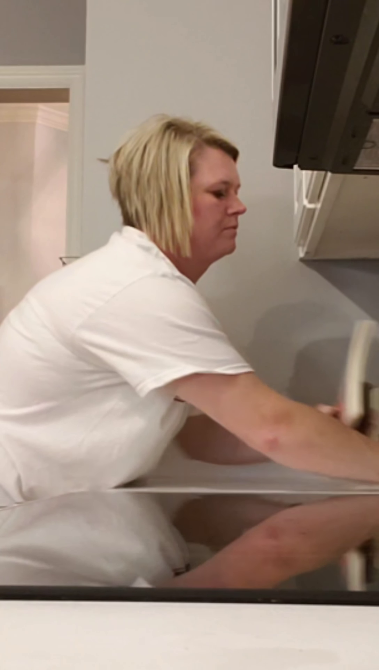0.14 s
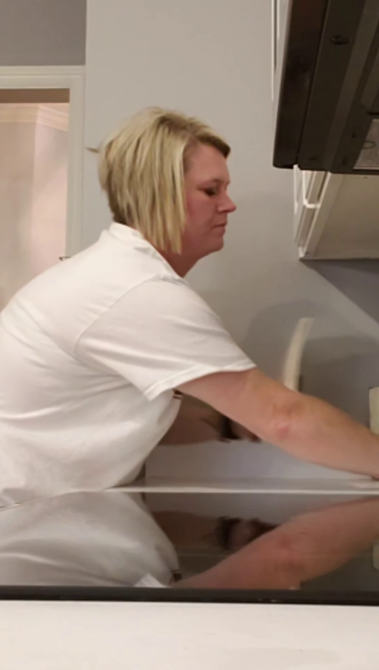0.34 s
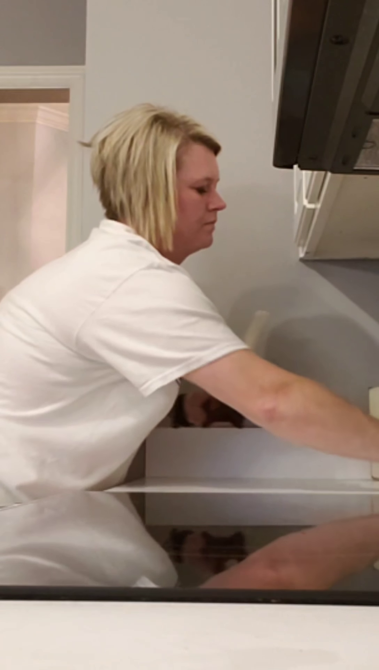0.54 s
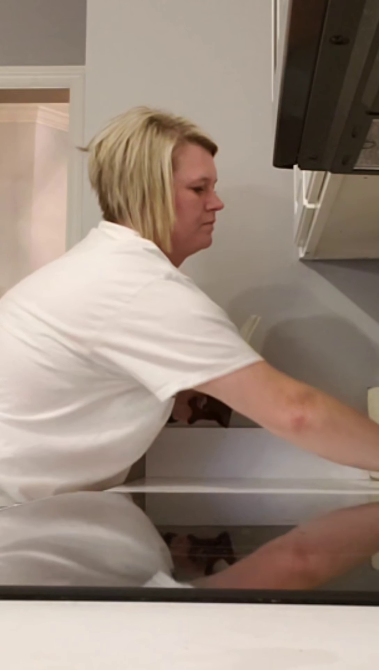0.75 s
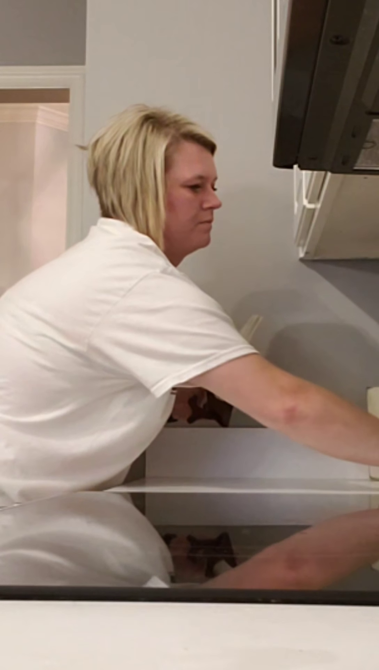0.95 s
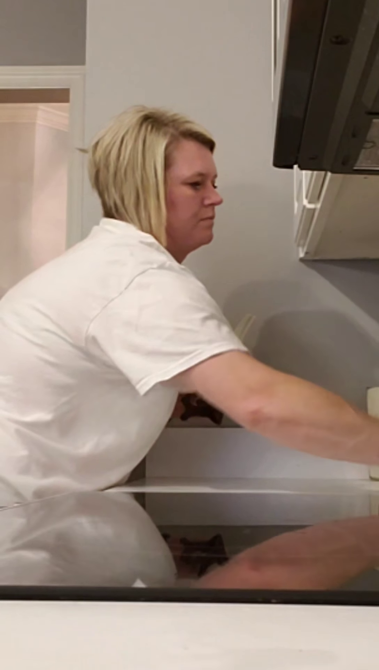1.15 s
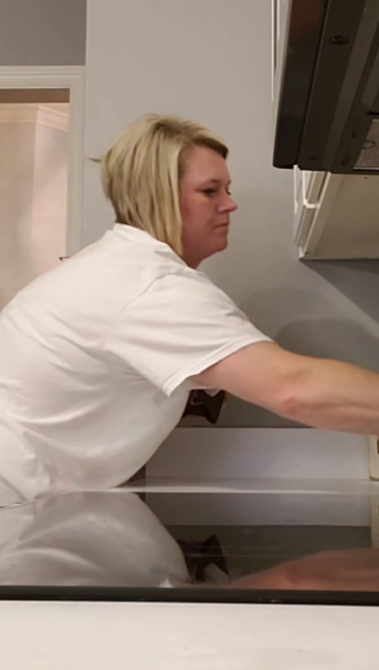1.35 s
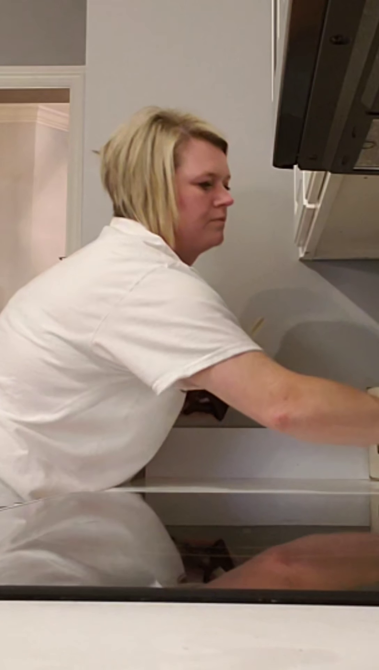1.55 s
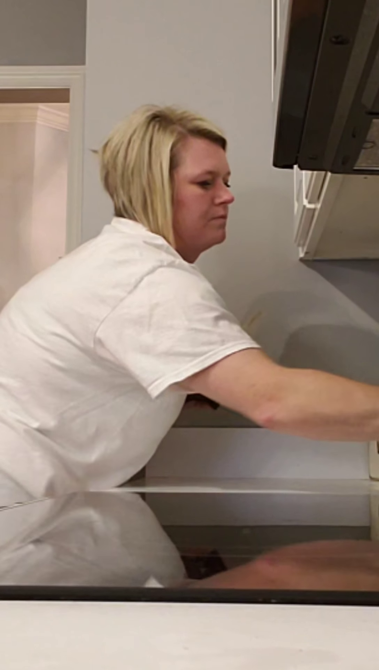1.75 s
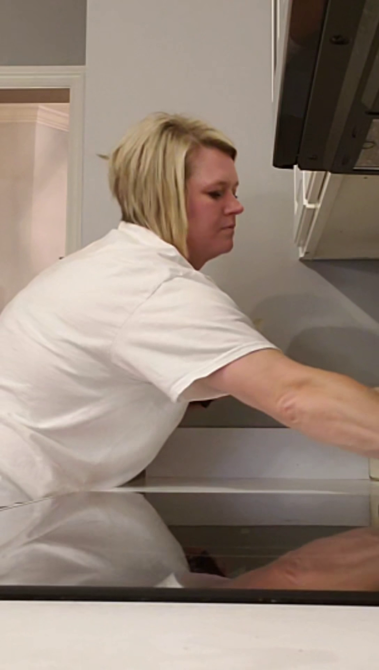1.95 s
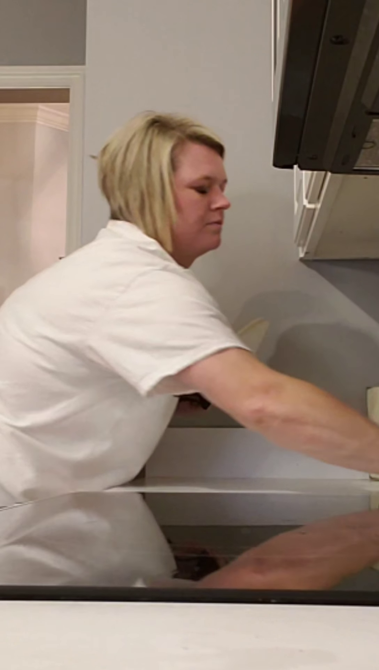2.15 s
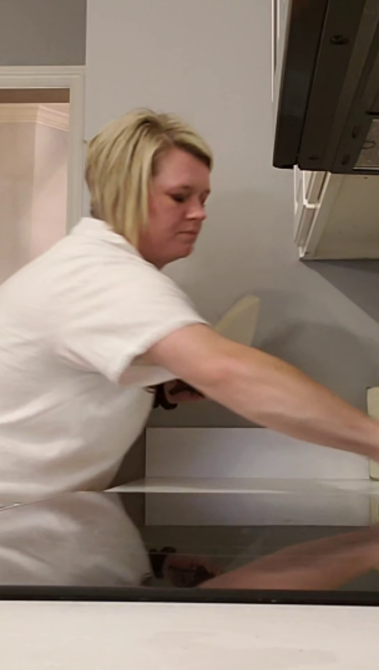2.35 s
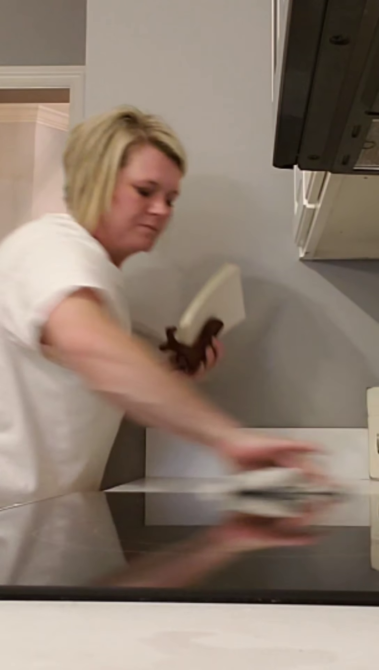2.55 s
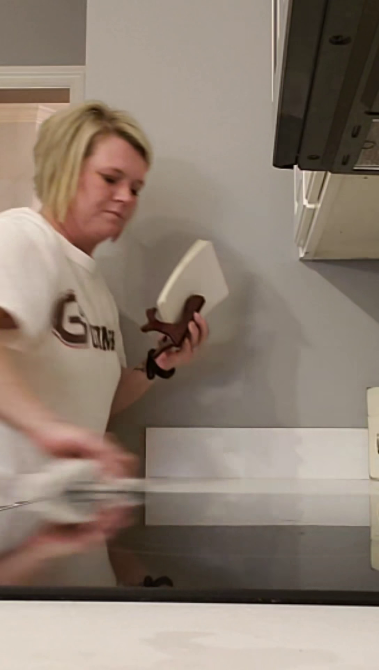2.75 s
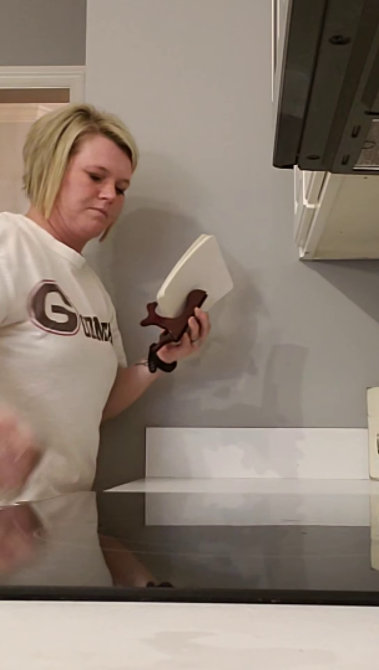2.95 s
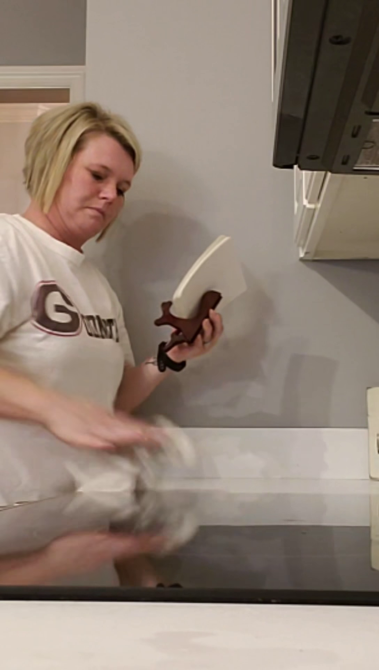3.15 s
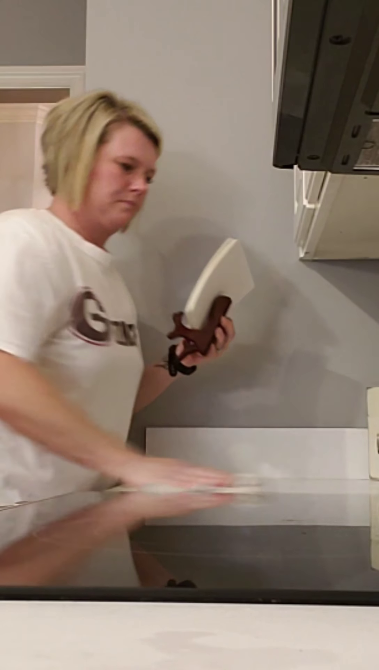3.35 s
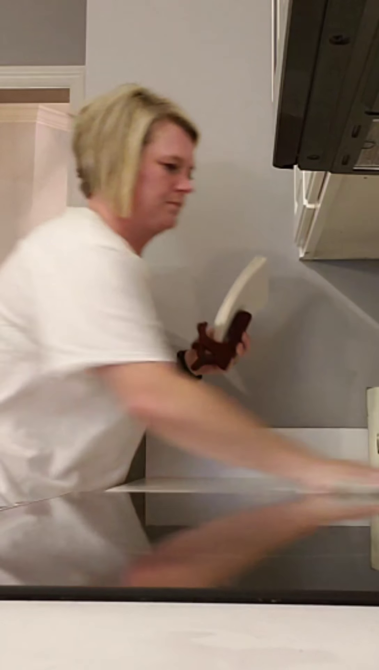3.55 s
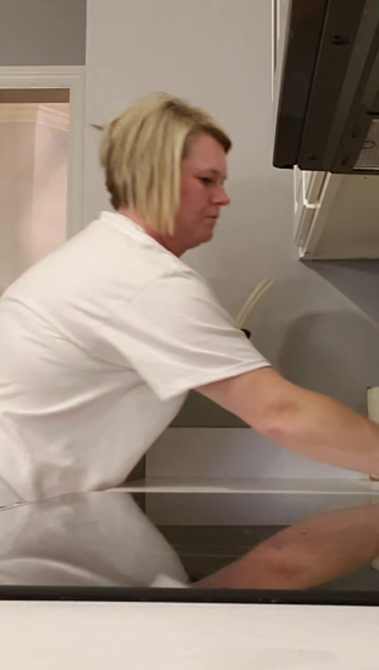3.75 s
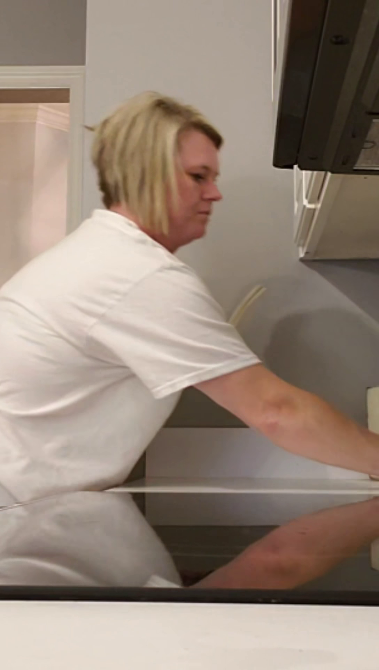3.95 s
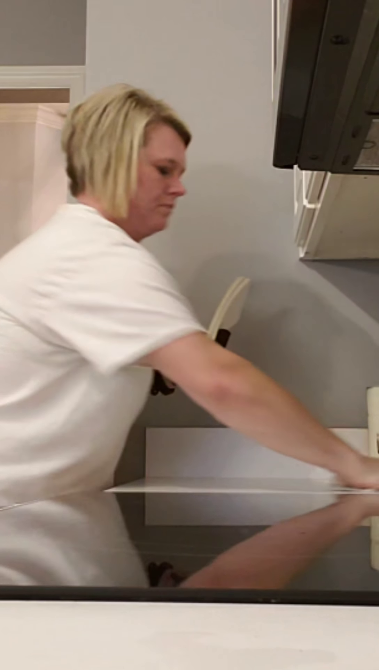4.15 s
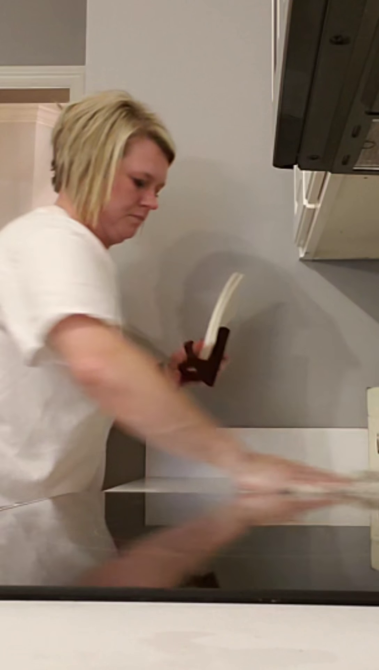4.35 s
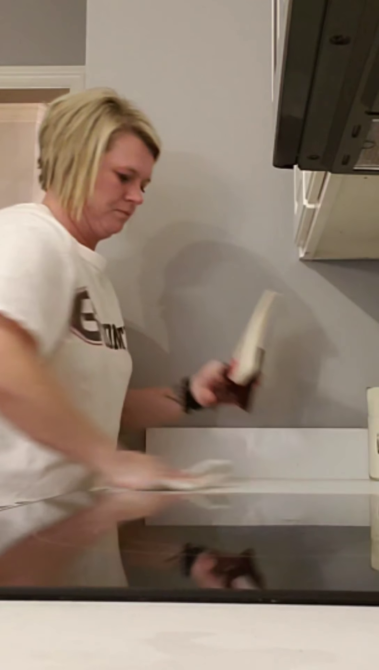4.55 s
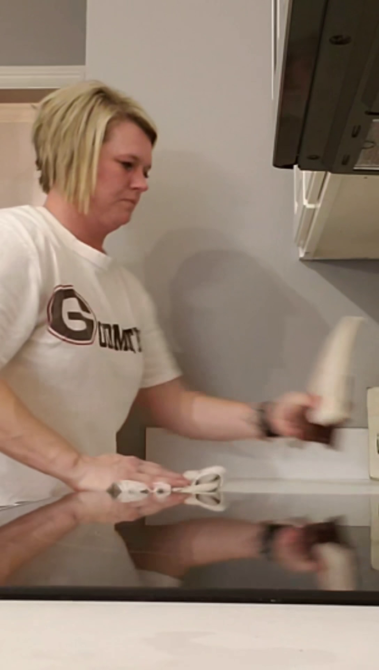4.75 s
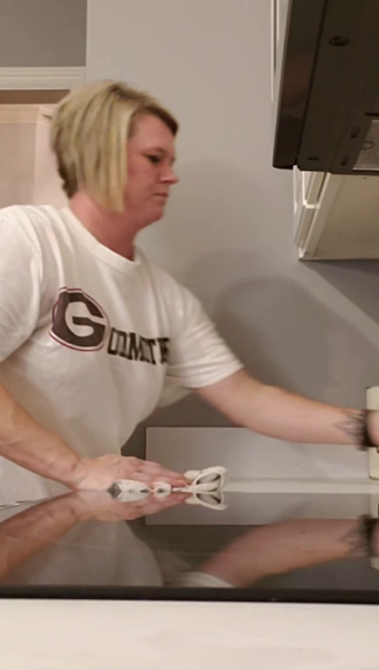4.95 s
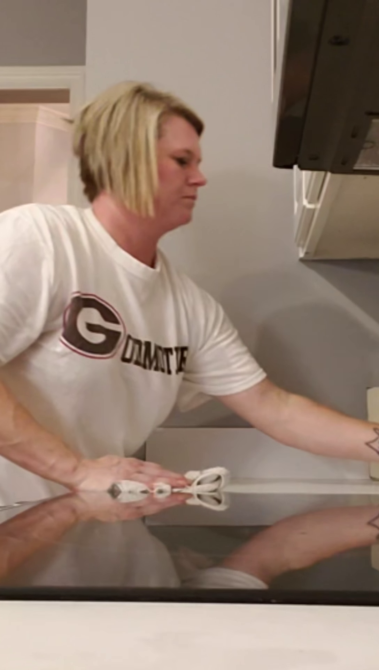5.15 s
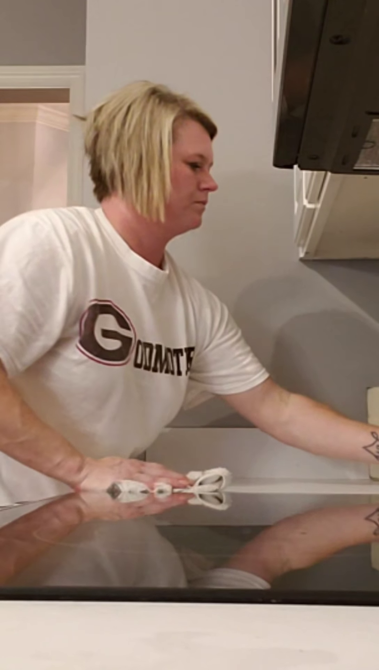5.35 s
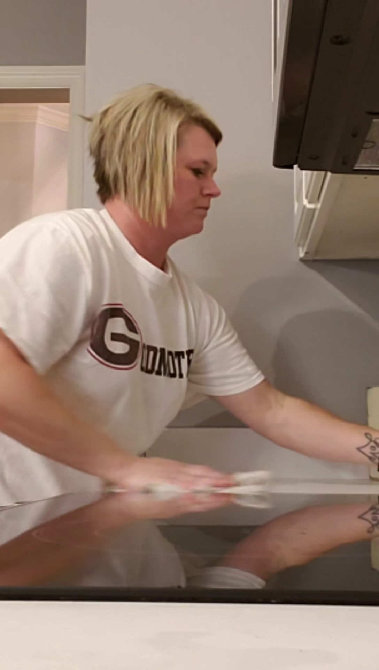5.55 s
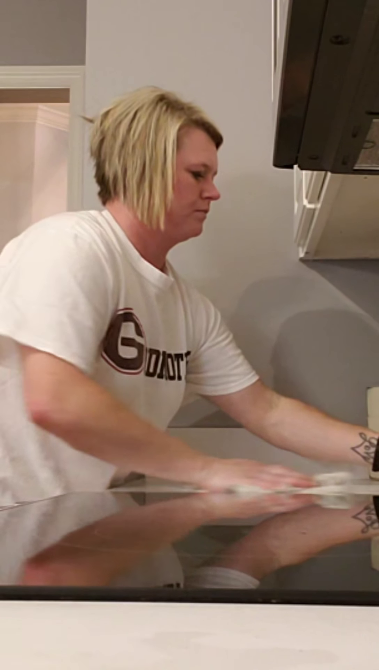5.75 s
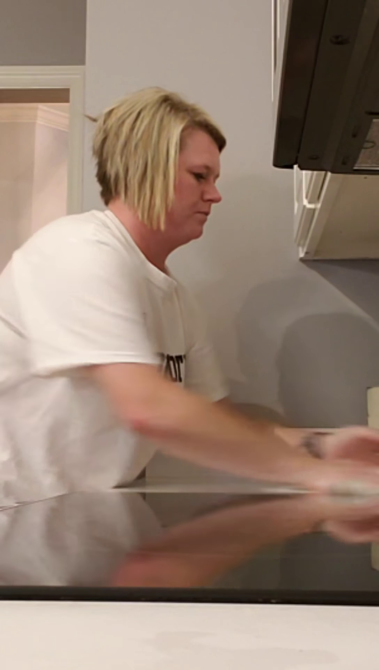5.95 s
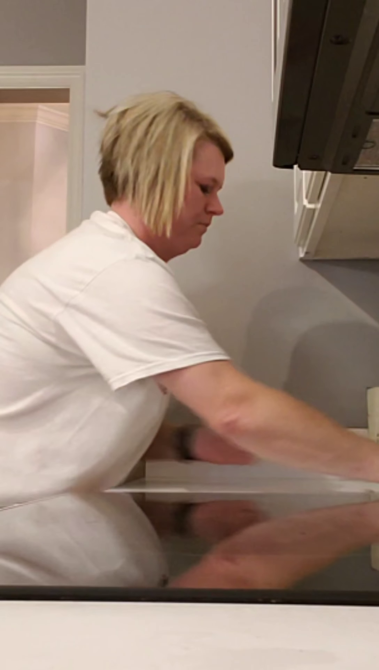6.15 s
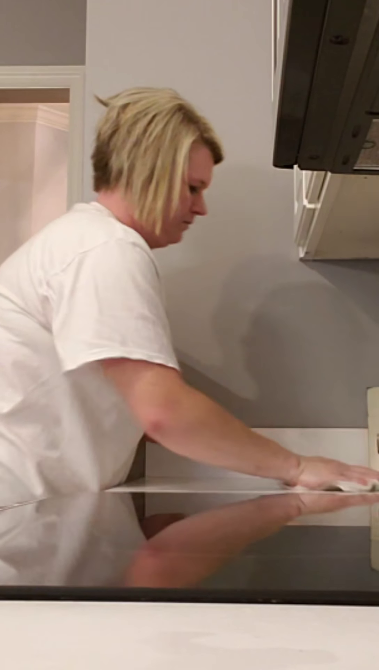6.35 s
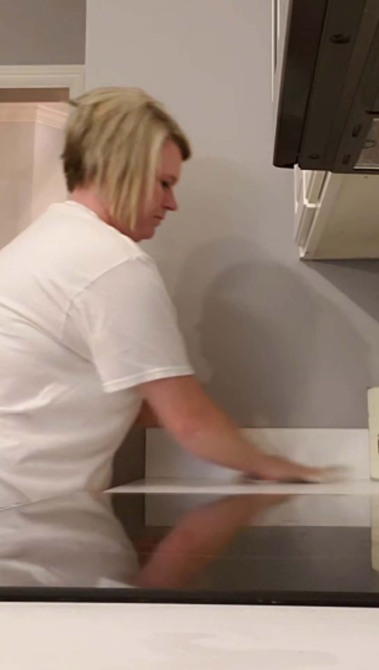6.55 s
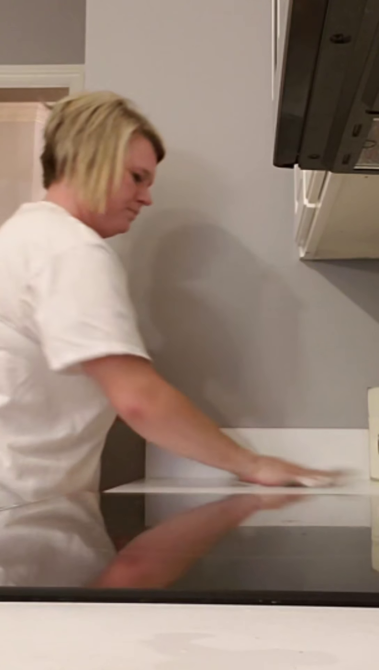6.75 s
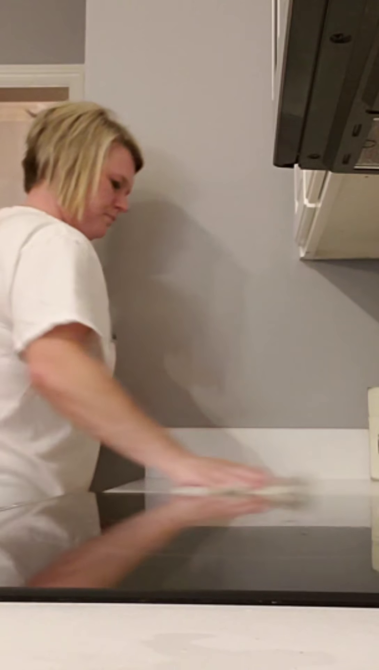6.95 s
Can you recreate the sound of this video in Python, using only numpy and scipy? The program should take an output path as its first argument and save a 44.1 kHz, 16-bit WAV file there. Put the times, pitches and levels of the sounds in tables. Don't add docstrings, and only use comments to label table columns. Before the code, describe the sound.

A small, hard-walled kitchen heard through a close handheld stereo microphone. A low refrigerator hum with soft fan air stays constant for about seven seconds. A rag stroke is already hissing at the start, ending near 0.3 s; brief rubs follow at 0.5 and 0.7, with faint taps and a dull palm thump at 0.8. Wiping resumes at 0.9, short swipes come around 1.5, and tiny high squeaks at 1.4, 1.9 and 3.3. Fuller strokes run from 2.0 to 2.85, with a small wooden knock at 2.8. After a quieter gap, brisk back-and-forth scrubbing fills 3.4 to 4.8. At 5.15 a wooden holder lands with a loud, sharp double clack, rattling and rocking until 5.3, with a short room tail. Lighter knocks follow at 5.6 to 5.8 as rubbing restarts, and overlapping swishes continue from 6.25 to the end.

```python
import sys
import numpy as np
from scipy import signal
from scipy.fft import rfft, irfft, next_fast_len
from scipy.io import wavfile
from scipy.ndimage import uniform_filter1d, map_coordinates

SR = 44100
rng = np.random.default_rng(int(sys.argv[2]) if len(sys.argv) > 2 else 0)


def voltage_ratio(decibels):
    exponent = np.asarray(decibels, float) / 20
    return 10 ** exponent


def digitize_waveform(pressure):
    field = np.atleast_2d(pressure).T
    bounded = np.clip(field, -1, 1)
    quanta = np.round(bounded * 32767).astype(np.int16)
    wavfile.write(sys.argv[1], SR, quanta)


N = 312669

# f/Hz, t60/s
ROOM_DECAY = [(150, 0.67), (400, 0.48), (1500, 0.54), (3000, 0.54), (8000, 0.39)]

COMPRESSOR_HZ, FAN_HZ, MAINS_HZ = 59.24, 39.75, 119.995
# order, level/dB
COMPRESSOR_ORDERS = [(1, -59), (4, -66)]
# order, level/dB
FAN_ORDERS = [(2, -60), (3, -62), (4, -66), (5, -65), (6, -64),
              (8, -64.5), (15, -66), (16, -82), (17, -71), (18, -67.5), (19, -68.5), (20, -105),
                (21, -74), (22, -88)]
# order, level/dB
MAINS_ORDERS = [(1, -44.5), (2, -56.5), (3, -64.5)]
# f/Hz, level/dB per Hz
AIR_SPECTRUM = [(22, -29), (48, -18), (68, -42), (100, 2.5), (200, -4), (750, -15), (1200, -20.5),
                (1500, -28.5), (2500, -38), (3350, -24), (3900, -38), (6800, -36), (8500, -56.5),
                (15800, -54)]
# f/Hz, likeness (-1 to 1)
AIR_LIKENESS = [(60, 0.99), (130, 0.84), (290, 0.83), (640, 0.28), (1400, -0.57), (3100, -0.54),
                (6800, -0.16), (15000, .25)]
# f/Hz, level/dB
AIR_LEAN = [(60, 4.5), (700, 1.5), (1300, 4.5), (2400, 6), (8000, 16.5), (15000, -8)]

# t/s, peak level/dB, hard edge level/dB, weight on the counter level/dB, free ringing (0-1)
CONTACTS = [(.797, -58.5, -3, 15, 0.9), (.809, -60, -4, 16, 0.75), (.832, -64, -8, 14, .8),
            (.852, -66, -10, 2, 0.9), (1.899, -54, -20, -9, 0.65), (2.799, -54, -15, -20, 0.5),
            (2.8123, -43.5, -10, -18, 0.25), (2.886, -54, -8, 8, 0.43), (5.1552, -22, 2.5, 4.5, 0.86),
            (5.161, -19.5, -9, -6, 0.95), (5.186, -42, 7.5, -17, 1), (5.203, -42.5, 8.5, -18, 1),
            (5.221, -46, -6, 3, 0.74), (5.248, -37.5, -0.5, 4, 0.93), (5.269, -30.5, -6, -3.5, 0.34),
            (5.288, -45, 1, -5, 0.5), (5.323, -46.5, -5, 3, 0.9), (5.6196, -42.5, -2.5, -3.5, 0.58),
            (5.644, -50, -10, -1, 0.36), (5.765, -49, -22, -19, 0.6)]
# f/Hz, level/dB, t60/s
EDGE_MODES = [(1500, -3.5, 0.069), (1613, 3.5, 0.081), (1570, -15, 0.035), (1810, -3.5, 0.075),
              (2900, -14.5, 0.093), (4520, -16, 0.046)]
# f/Hz, level/dB, t60/s
WOOD_MODES = [(823, -8.5, 0.058), (1000, -49, 0.029), (1003, -13.5, 0.078), (1116, -2, 0.082),
              (1160, 1, 0.064), (1300, -2, 0.046), (1410, -12, 0.035)]
# f/Hz, level/dB, t60/s
COUNTER_MODES = [(191.4, -14.5, 0.13), (258, -11, 0.088), (390.8, -1, 0.14), (408.4, -4.5, 0.22),
                 (444.4, -14, 0.27), (485, -21, 0.075), (622, 3, 0.066), (634, -18, 0.032), (702, -6, 0.11)]
# t/s, peak level/dB, f/Hz
PALM_THUMPS = [(.66, -50, 97), (0.791, -37, 96), (0.808, -38, 189), (0.849, -32, 176), (1.429, -37, 103),
               (1.652, -37, 106), (1.909, -39, 100), (2.881, -51, 201), (3.299, -36, 96), (5.25, -36.5, 99),
               (5.601, -37, 102.5), (5.631, -42, 190)]
# f/Hz, level/dB per Hz
SCUFF_SPECTRUM = [(500, -11), (900, 6), (2000, 0.5), (3300, -3.5), (4000, -14), (6500, -14), (9000, -26.5),
                  (13000, -32), (15800, -43)]
# f/Hz, level/dB per Hz
CLATTER_SPECTRUM = [(60, -62), (150, -11), (194, -6.5), (303, -8), (391, -4.5), (481, -19), (620, 0),
                    (900, -12.5), (1620, -12), (2400, -24), (3300, -27), (9000, -56), (15800, -49)]
# f/Hz, level/dB
HOLDER_LEAN = [(200, 2.5), (400, 4.5), (700, 4), (1300, 0), (3000, 6.5)]

# t/s, length/s, speed level/dB, pressure level/dB, speed drift along the stroke/dB
RAG_STROKES = [(-0.017, 0.339, -60.0, 1.5, -4.5), (0.466, 0.091, -63.0, 0.5, 3),
               (0.66, 0.19, -73.5, 2.5, 22), (0.915, 0.24, -62.5, -1, -2.5), (1.47, 0.092, -54.0, -0.0, -2),
               (1.511, 0.082, -62, -2, 9.5), (1.861, 0.045, -73, 3.5, 17), (2.023, 0.2, -59.5, 0, 1.5),
               (2.377, 0.25, -55.5, -2.5, -7.5), (2.58, 0.281, -56.0, -1.5, 1.5),
               (3.375, 0.25, -58.5, -0.5, 3.5), (3.626, 0.14, -59.5, 1, 3.5), (3.826, 0.36, -59.0, 0.0, -8),
               (4.2, 0.24, -56.5, -1.5, -6.5), (4.477, 0.23, -55.0, -4, -11.5),
               (4.689, 0.085, -61, -2.5, 8), (4.986, 0.23, -85, 8, 4), (5.48, 0.16, -68, 0.5, 10),
               (5.678, 0.29, -61.5, -1, -8), (5.919, 0.23, -61.5, 0, 0.5), (6.263, 0.28, -61.0, 1.5, 4),
               (6.551, 0.36, -65.5, 4.0, -8), (6.765, 0.22, -58.0, 0.5, -1.5),
               (7.0, 0.22, -57.0, -1.0, 12.5)]
# t/s, half width/s, level/dB
CLOTH_BUNCHES = [(.2, 0.042, 0), (1.03, 0.12, 7), (1.55, 0.068, -3), (2.47, 0.1, -6), (3.55, 0.054, 0.5),
                 (3.8, .05, -5), (4.29, .05, -2), (4.44, 0.094, 7), (6.55, .05, -2), (5.49, .04, 13),
                 (6.7, 0.054, -7), (6.81, 0.028, 4), (7.05, .04, -3)]
# level/dB of hiss, rub, scrub
REST_LEVELS = [-82, -70, -73.5]
# f/Hz, level/dB per Hz
RAG_SPECTRUM = [(530, -34), (900, -1), (1200, 6), (1380, -2), (1560, 1), (2230, 2), (2490, 0.5),
                (3350, -2.5), (4970, -5), (9260, -12.5), (12500, -4), (15700, -10)]
# f/Hz, likeness (-1 to 1)
RAG_LIKENESS = [(600, 0.65), (1400, 0.14), (3100, -0.12), (6800, -0.036), (15000, 0.5)]
# f/Hz, level/dB
RAG_LEAN = [(700, -1.5), (2400, 0), (4400, 3.5), (8100, -1.5), (15000, -3.5)]
# t/s, level/dB, f/Hz, length/s
CLOTH_SQUEAKS = [
    (1.374, -56.5, 3380, 0.062),
    (1.874, -61, 3300, 0.054),
    (3.28, -57, 3380, 0.053),
]


def unit(x):
    return x / np.sqrt(np.mean(x ** 2) + 1e-20)


def along(points, hz):
    f, value = np.transpose(points)
    return np.interp(np.log(hz + 1), np.log(f + 1), value)


def wobble(rate):
    coarse = np.arange(0, N + 32, 32)
    knots = rng.standard_normal(int(N * rate / SR) + 4)
    return np.interp(np.arange(N), coarse, map_coordinates(knots, [coarse * rate / SR]))


def filtered(x, response):
    m = next_fast_len(N + SR // 2)
    return irfft(rfft(x, m) * response(np.fft.rfftfreq(m, 1 / SR)), m)[..., :N]


def lean(left_db, hz):
    return voltage_ratio(along(left_db, hz) * np.array([[.5], [-.5]]))


def spread(pair, spectrum, likeness, left_db):
    def mid_side(hz):
        angle = np.arccos(np.clip(along(likeness, hz), -1, 1)) / 2
        return voltage_ratio(along(spectrum, hz)) * np.array([np.cos(angle), np.sin(angle)])

    mid, side = filtered(pair, mid_side)
    return unit(filtered(np.array([mid + side, mid - side]), lambda hz: lean(left_db, hz)))


def ring(modes, t, attack, free):
    hz, db, t60 = np.transpose(modes)[:, :, None]
    strength = voltage_ratio(db + rng.standard_normal(db.shape) - 60 * t / np.abs(t60 * free))
    strength[1::2] *= -1
    onset = 1 - np.exp(-t / (attack * free))
    return np.sum(strength * np.sin(2 * np.pi * hz * t), axis=0) * onset


def room(x):
    hz, t, z = signal.stft(rng.standard_normal((2, SR)), SR, nperseg=256)
    shared = 1 / (1 + (hz[:, None] / 600) ** 2)
    z[1] = shared * z[0] + np.sqrt(1 - shared ** 2) * z[1]
    decay = voltage_ratio(-60 * t / along(ROOM_DECAY, hz)[:, None])
    tail = signal.istft(z * decay, SR, nperseg=256)[1]
    tail *= 1 - np.exp(-np.arange(tail.shape[1]) / SR / 0.012)
    return signal.fftconvolve(np.atleast_2d(x), tail / np.linalg.norm(tail[0]), axes=1)[:, :N]


def refrigerator():
    t, hum = np.arange(N) / SR, np.zeros((2, N))
    machines = ((COMPRESSOR_HZ, COMPRESSOR_ORDERS, .3),  # f/Hz, orders, waver/dB
                (FAN_HZ, FAN_ORDERS, 1.5),
                (MAINS_HZ, MAINS_ORDERS, .3))
    for base_hz, orders, waver_db in machines:
        turns = base_hz * t + rng.random() + 0.0069 * waver_db * wobble(1.502)
        for order, db in orders:
            hz = base_hz * order
            lag = hz / 1400 * rng.uniform(-1.44, 1) * np.array([[1], [-1]])
            scatter = (hz / 300) ** 2 * rng.standard_normal()
            line = np.cos(2 * np.pi * order * turns + scatter + lag)
            hum += voltage_ratio(db + 3.0 + waver_db * wobble(2.89)) * lean(AIR_LEAN, hz) * line
    air = spread(rng.standard_normal((2, N)), AIR_SPECTRUM, AIR_LIKENESS, AIR_LEAN)
    return hum + voltage_ratio(-46.5 + 0.38 * wobble(4.32)) * air


def holder():
    crack_db, crack_t60_s, crack_hz = -3, .014, 2300
    t = np.arange(SR // 3) / SR
    ringing, scuffs, cracks = np.zeros((3, N + SR))
    blows = np.zeros(N)
    for start, db, edge_db, weight_db, free in CONTACTS:
        i = round(start * SR)
        blow = voltage_ratio(edge_db) * ring(EDGE_MODES, t, .004, free) + ring(WOOD_MODES, t, .004, free)
        blow += voltage_ratio(weight_db + 5.5) * ring(COUNTER_MODES, t, 0.023, free)
        ringing[i:][:len(t)] += voltage_ratio(db + 6) * blow
        scuff_db = 0.98 * db + edge_db - 4.0
        scuffs[i:][:len(t)] += voltage_ratio(scuff_db - 60 * t / (0.096 * free)) * (1 - np.exp(-t / 0.00088))
        cracks[i:][:len(t)] += voltage_ratio(db + crack_db - 60 * t / crack_t60_s) * (1 - np.exp(-t / 0.00089))
        blows[i] = voltage_ratio(db + 41)
    for start, db, hz in PALM_THUMPS:
        thump = ring([(hz, 0, 24 / hz)], t, 3.7 / hz, free=0.48)
        ringing[round(start * SR):][:len(t)] += voltage_ratio(db + 9.0) * thump
    ringing = ringing[:N]

    grit = spread(rng.standard_normal((2, N)), SCUFF_SPECTRUM, RAG_LIKENESS, RAG_LEAN)
    crack = filtered(cracks[:N] * grit, lambda hz: 1 / (1 + 1j * hz / crack_hz) ** 4)
    scuff = scuffs[:N] * grit + crack
    delay_s = np.array([[.00012], [0]])
    direct = filtered(ringing, lambda hz: lean(HOLDER_LEAN, hz) * np.exp(-2j * np.pi * hz * delay_s))
    clatter = filtered(blows, lambda hz: voltage_ratio(along(CLATTER_SPECTRUM, hz)))
    return direct + scuff + room(voltage_ratio(-14.0) * ringing + clatter)


def patchy(pair, depth_db):
    z = signal.stft(pair, nperseg=512)[2]
    field = uniform_filter1d(rng.standard_normal(z.shape[1:]), size=9, axis=0)
    field = uniform_filter1d(field, size=8, axis=1)
    return signal.istft(z * voltage_ratio(depth_db * unit(field)), nperseg=512)[1][:, :N]


def hand():
    rise_db_per_s, fall_db_per_s = 302, 219
    ease_s = 0.019
    t = np.linspace(0, N / SR, num=N // 64)
    start, length, speed_db, pressure_db, drift_db = np.transpose(RAG_STROKES)[:, :, None]

    def beyond(seconds):
        return ease_s * np.logaddexp(0, seconds / ease_s)

    progress = np.clip((t - start) / length, 0, 1) - .5
    swing_db = drift_db * progress
    swing_db = swing_db - rise_db_per_s * beyond(start - t) - fall_db_per_s * beyond(t - start - length)
    bunch_db = sum(db * np.exp(-((t - at) / width) ** 2) for at, width, db in CLOTH_BUNCHES)

    hiss_db = -0.5 + swing_db
    rub_db = 4.5 + pressure_db + 0.75 * swing_db
    scrub_db = -0.65 + 2 * pressure_db + 0.79 * swing_db + 3 * progress + bunch_db
    gains = []
    for layer_db, rest_db in zip((hiss_db, rub_db, scrub_db), REST_LEVELS):
        power = np.sum(voltage_ratio(speed_db + layer_db) ** 2, axis=0) + voltage_ratio(rest_db) ** 2
        gains.append(np.interp(np.arange(N) / SR, t, np.sqrt(power)))
    return gains


def squeaks():
    glide_hz_per_s = 1200
    t, out = np.arange(N) / SR, np.zeros(N)
    for start, db, hz, length in CLOTH_SQUEAKS:
        since = t - start
        swell = np.sin(np.pi * np.clip(since / length, 0, 1)) ** 2
        phase = 2 * np.pi * (hz + glide_hz_per_s / 2 * since) * since + wobble(150)
        out += voltage_ratio(db) * swell * np.sin(phase)
    return out


def rag():
    hiss_gain, rub_gain, scrub_gain = hand()
    slips = rng.standard_normal((2, N)) * voltage_ratio(1.9 * rng.exponential(size=(2, N)))
    slips = patchy(slips, depth_db=1.5) * voltage_ratio(0.74 * wobble(13))
    friction = spread(slips, RAG_SPECTRUM, RAG_LIKENESS, RAG_LEAN)
    scrub = filtered(friction, lambda hz: 1 / (1 + (hz / 3300) ** 6))
    hiss = filtered(friction, lambda hz: 1 / (1 + (8600 / (hz + 1)) ** 8))
    rub = friction - scrub - hiss
    flicker = voltage_ratio(1.4 * wobble(32))
    stroke = rub_gain * unit(rub) + hiss_gain * flicker * unit(hiss) + scrub_gain * unit(scrub)
    stroke += squeaks()
    return stroke + voltage_ratio(-13.5) * room(stroke)


def scene():
    return refrigerator() + holder() + rag()


def roll_off(x):
    return signal.sosfilt(signal.butter(12, 15820, fs=SR, output="sos"), x)


def record(dry):
    top_hz = 15780
    mix = filtered(dry, lambda hz: hz < top_hz)
    return roll_off(mix)


dry = scene()
out = record(dry)
digitize_waveform(out)
```